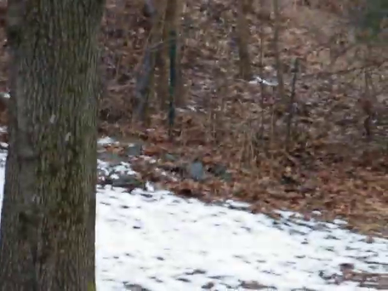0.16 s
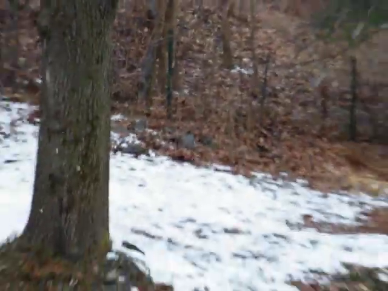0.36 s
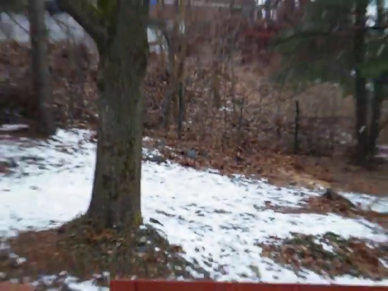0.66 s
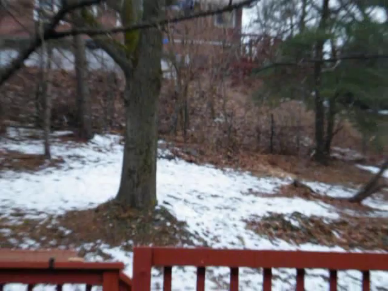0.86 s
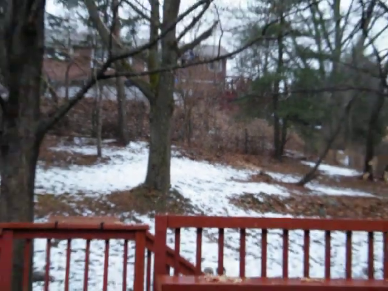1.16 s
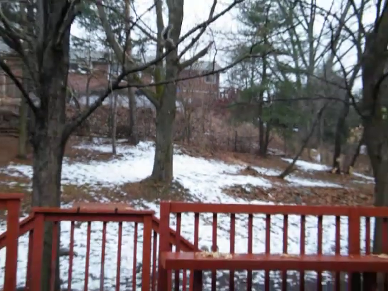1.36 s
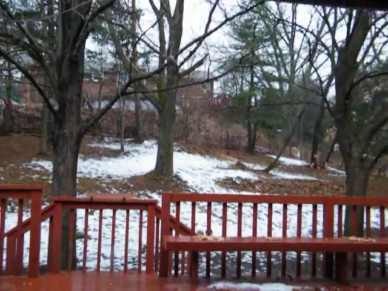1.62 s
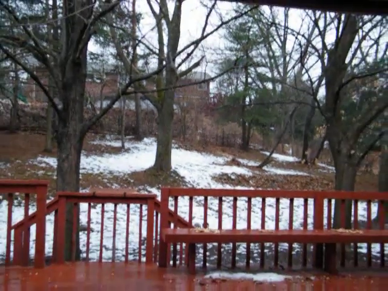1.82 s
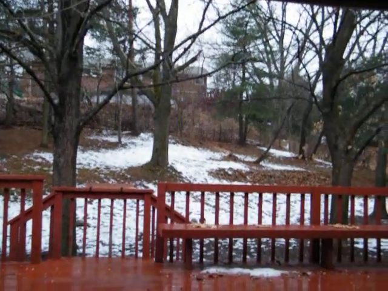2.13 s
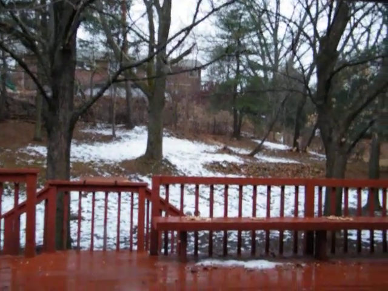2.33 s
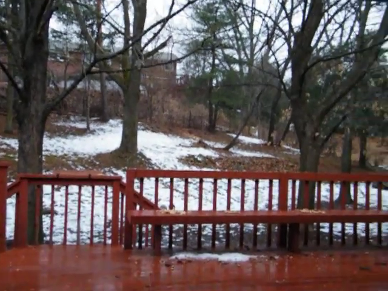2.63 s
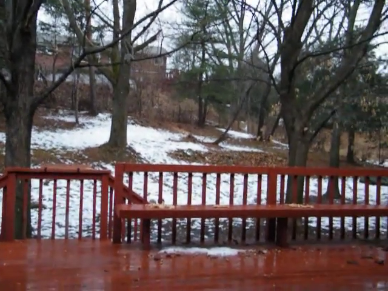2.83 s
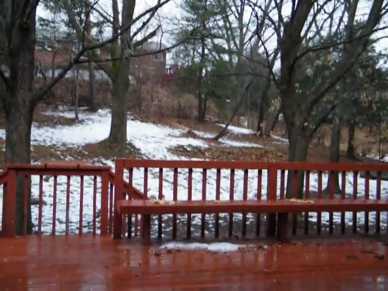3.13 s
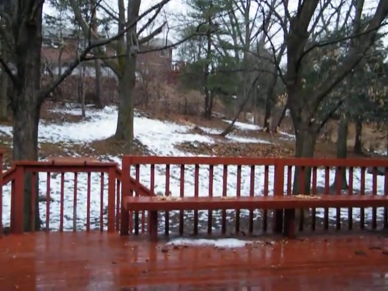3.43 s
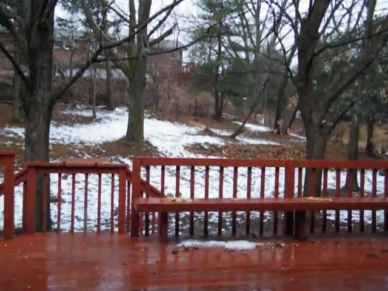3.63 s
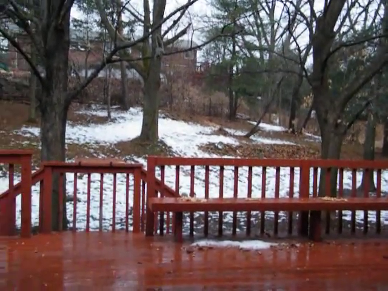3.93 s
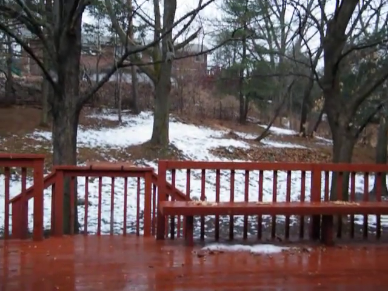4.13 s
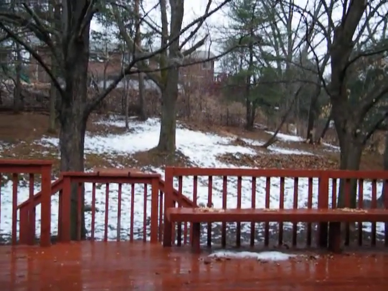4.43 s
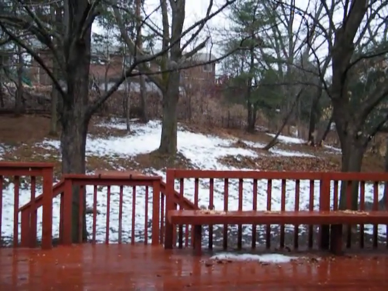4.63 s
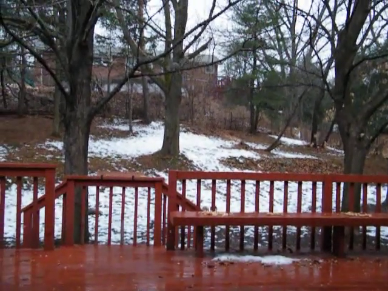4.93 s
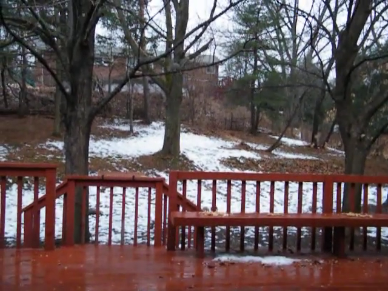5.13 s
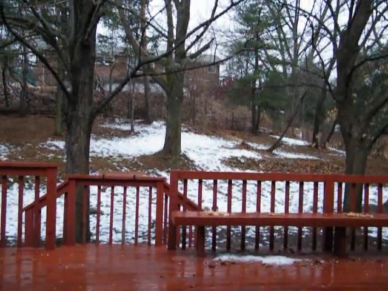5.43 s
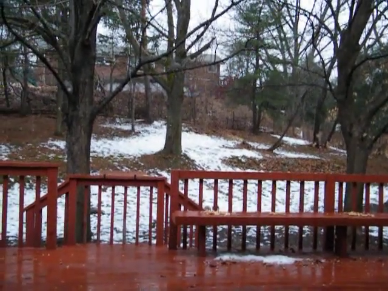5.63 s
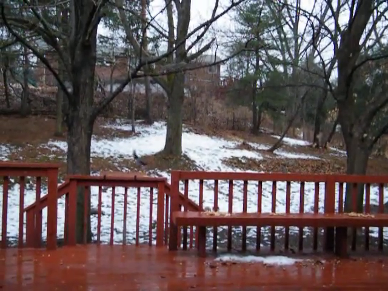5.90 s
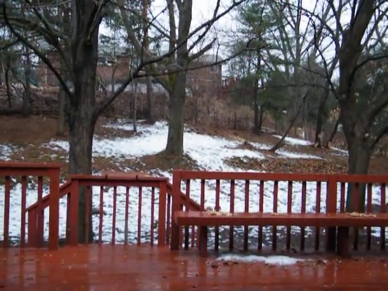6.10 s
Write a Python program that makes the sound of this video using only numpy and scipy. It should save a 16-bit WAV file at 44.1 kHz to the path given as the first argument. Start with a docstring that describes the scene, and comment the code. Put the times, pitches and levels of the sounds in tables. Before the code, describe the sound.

In a wooded, snowy yard, two close jay jeers ring out early, harsh and reedy, with echoes from a wall and trees. Handling clicks come right at the microphone before and around them. After a quieter stretch of distant jeers, leaf ticks and soft bell-like whistles, another very loud jeer bursts out, then a weaker one. Tiny chirps, whistles and overlapping distant jeers finish over airy hush, faint flock twitter and distant rumble.

```python
"""A faint whistle and a quick run of camera clicks in the hand open this snowy yard; then blue jays jeer close by.
Jeers are falling stacks of harmonics that fray into noise; duller ones answer from the woods.
Jays also whistle softly in nearly pure tones, small birds chirp in rising tones, and noise bursts tick as dry leaves.
Decaying noise echoes make a wall and trees; coloured noise makes air, a low distant rumble and a far flock.
The camera's gain ducks under loud calls."""
import sys
import numpy as np
from scipy import signal
from scipy.fft import rfft, irfft, next_fast_len
from scipy.io import wavfile
from scipy.ndimage import uniform_filter1d, minimum_filter1d, map_coordinates

SR = 44100
rng = np.random.default_rng(int(sys.argv[2]) if len(sys.argv) > 2 else 0)


def int16_out(signal):
    """Quantize to a 16-bit WAV file."""
    q = np.round(np.clip(np.atleast_2d(signal).T, -1, 1) * 32767)
    wavfile.write(sys.argv[1], SR, q.astype(np.int16))


N = 276066
TIME = np.arange(N) / SR


def amp(db):
    """Decibels to linear gain."""
    return 10 ** (np.asarray(db) / 20)


def unit(x):
    """Scale a sound to rms 1."""
    return x / np.sqrt(np.mean(x ** 2) + 1e-20)


def along(points, hz):
    """Read a curve of (Hz, value) points on a log frequency axis."""
    f, v = np.transpose(points)
    return np.interp(np.log(hz + 1), np.log(f), v)


def wobble(rate, size):
    """A smooth random curve with rate knots a second."""
    knots = rng.standard_normal(int(size * rate / SR) + 4)
    return map_coordinates(knots, [np.arange(size) * rate / SR])


def filtered(x, response):
    """Shape the spectrum of x by a response given as a function of Hz."""
    padded = next_fast_len(len(x) + 8192)
    spectrum = rfft(x, padded) * response(np.fft.rfftfreq(padded, 1 / SR))
    return irfft(spectrum, padded)[:len(x)]


def noise(spectrum, size=N):
    """Coloured noise of rms 1."""
    return unit(filtered(rng.standard_normal(size), lambda hz: amp(along(spectrum, hz))))


def add(track, s, sound):
    """Mix a sound into the track at time s."""
    part = track[max(round(s * SR), 0):][:len(sound)]
    part += sound[:len(part)]


def gate(t, start, end, rise, fall):
    """Open from start and die away after end; rise and fall are time constants in seconds."""
    opening = 1 - np.exp(-np.maximum(t - start, 0) / rise)
    return opening * np.exp(-np.maximum(t - end, 0) / fall)


# How long the trees ring on in each band. Each row: frequency in Hz, time to fall 60 dB in seconds.
WOODS_DECAY = [(500, 0.25), (1700, 0.65), (3400, 0.64), (7000, 0.46), (14000, 0.056)]


def yard(x, near_db, woods_db, near_t60=0.67):
    """Add sparse scatter from the deck and wall, then the dense tail of the trees with its own decay per band."""
    hz, t, z = signal.stft(rng.standard_normal(SR), SR, nperseg=256)
    decay = amp(-60 * t / along(WOODS_DECAY, hz)[:, None])
    tail = signal.istft(z * decay, SR, nperseg=256)[1]
    t = np.arange(len(tail)) / SR
    tail = tail * (1 - np.exp(-t / 0.008))  # the trees build up softly
    sparse = (rng.random(len(t)) < .02) * (t > .003)
    near = rng.standard_normal(len(t)) * sparse * amp(-60 * t / near_t60)
    echo = amp(near_db) * near / np.linalg.norm(near) + amp(woods_db) * tail / np.linalg.norm(tail)
    wet = x + signal.fftconvolve(x, echo)[:N]
    return wet / np.sqrt(1 + np.sum(echo ** 2))  # allow for the energy the echo adds


# Colour of the open air. Each row: frequency in Hz, relative level in dB.
AIR_TONE = [(20, -3), (36, -14.5), (60, -1), (85, 4.5), (150, -4), (200, -3), (400, -7), (1000, -14),
            (2000, -19), (4000, -22.5), (7000, -21), (10000, -36), (16000, -42)]
# Bands of far traffic. Each row: centre in Hz, distance to 1/e of the peak gain in Hz, rms level in dB.
TRAFFIC_DRONE = [(92, 37, -51.5), (190.7, 17, -48.5), (289, 30.5, -52.5)]
# Colour of the far flock. Each row: frequency in Hz, relative level in dB.
FLOCK_TONE = [(4000, -35), (5500, 6), (6300, 16), (7300, -20), (8500, -9), (11000, -56)]


def background():
    """Noise shaped into open air, narrow low bands of far traffic and the swelling, blurred twitter of a flock."""
    out = amp(-40 + 1.38 * wobble(2.0, N)) * noise(AIR_TONE)
    for centre_hz, width_hz, db in TRAFFIC_DRONE:
        band = filtered(rng.standard_normal(N), lambda hz: np.exp(-((hz - centre_hz) / width_hz) ** 2))
        out += amp(db) * unit(band)
    swell_db = 2.5 * wobble(4, N) + 1.5 * wobble(25, N)
    return out + amp(-58.5 + swell_db) * noise(FLOCK_TONE)


# Spells of rummaging in the leaves. Each row: start in seconds, end in seconds, mean tick level in dB before trim.
RUMMAGE_SPELLS = [(1.885, 1.95, -42), (2.92, 2.998, -41), (3.317, 3.395, -33), (3.603, 3.673, -29),
                  (4.422, 4.498, -27)]
RUMMAGE_PER_S = 60  # small ticks a second


def rummaging(scatter_db=3):
    """Small ticks at chance moments and levels within each spell."""
    ticks = []
    for start, end, db in RUMMAGE_SPELLS:
        for _ in range(round((end - start) * RUMMAGE_PER_S)):
            ticks.append((rng.uniform(start, end), db + rng.normal(0, scatter_db)))
    return ticks


# Loudest ticks in the leaves. Each row: start in seconds, level in dB before trim.
LOUD_TICKS = [(2.6433, -23.5), (2.7608, -23), (2.9963, -22), (3.3862, -21), (3.5098, -23), (3.582, -26),
              (4.566, -18), (4.7146, -21), (5.646, -26), (6.0378, -18.5), (6.145, -24)]
# Colour of a dry snap, shared with the camera's crack. Each row: frequency in Hz, relative level in dB.
SNAP_TONE = [(1200, -65), (2500, -14), (4000, -6.5), (6300, 6.5), (8500, -8), (11000, -15.5), (16000, -23)]


def leaf_ticks(trim_db=-4.5):
    """Dry snaps of fast-decaying noise, each with a longer uneven crumble under it."""
    out, t = np.zeros(N), TIME[TIME < .1]
    for s, db in LOUD_TICKS + rummaging():
        snap = amp(-60 * t / 0.017)
        crumble = amp(-8 - 60 * t / 0.22 + 2.26 * wobble(410, len(t)))
        add(out, s, amp(db + trim_db) * (snap + crumble) * noise(SNAP_TONE, len(t)))
    return yard(out, near_db=-8, woods_db=-36.0)


RATCHET_START_S, RATCHET_STEP_S = .0712, .0193  # first click and even spacing
# first click before trim, growth per click, boost of the body knock
RATCHET_DB, RATCHET_GROWS_DB, RATCHET_KNOCK_DB = -20.5, 1.76, 7


def ratchet(count):
    """An even run of clicks, each a little firmer than the last."""
    clicks = []
    for k in range(count):
        start = RATCHET_START_S + k * RATCHET_STEP_S
        clicks.append((start, RATCHET_DB + k * RATCHET_GROWS_DB, RATCHET_KNOCK_DB))
    return clicks


# Single camera clicks. Each row: start in seconds, level in dB before trim, boost of the low body knock in dB.
SINGLE_CLICKS = [(0.2286, -10, -7), (0.239, -11, 4), (.5875, -12.5, 7.5), (0.722, -2.5, -2.5),
                 (.914, -9.5, -3), (1.621, -18, 1)]
# Ringing modes of the plastic case. Each row: frequency in Hz, mean level in dB before the click's own level,
# time to fall 60 dB in seconds.
CASE_MODES = [(775, -7.5, 0.053), (1107, -6, 0.016), (2693, -1.5, 0.012), (4250, 10, 0.0045),
              (4570, -5, 0.039), (6130, 3, 0.0094), (6700, -20, 0.015), (8200, -10, 0.0174)]


def camera_clicks(trim_db=-9.5):
    """Each click cracks with noise and rings the plastic case; its knock sets how far the low modes join in."""
    out, t = np.zeros(N), TIME[TIME < .05]
    for s, db, knock_db in ratchet(count=5) + SINGLE_CLICKS:
        ring = np.zeros(len(t))
        for hz, mode_db, t60 in CASE_MODES:
            level_db = mode_db + knock_db * (hz < 2000) + rng.normal(0, 3.4)  # no two clicks alike
            phase = 2 * np.pi * hz * t + 1.4 * wobble(524, len(t))
            ring += amp(level_db - 60 * t / t60) * np.sin(phase)
        crack = amp(-3 - 60 * t / 0.018) * noise(SNAP_TONE, len(t))
        attack = 1 - np.exp(-t / 0.000085)
        add(out, s, amp(db + trim_db) * (ring + crack) * attack)
    return out


# Small birds. Each row: start in seconds, length in seconds, top pitch in Hz, level in dB before trim.
SMALL_BIRDS = [(0.204, 0.027, 7260, -31.5), (0.46, 0.012, 7915, -19.5), (2.192, .025, 7510, -40),
               (2.277, 0.019, 7900, -33), (2.457, 0.0123, 7920, -22), (3.037, 0.021, 8200, -36),
               (3.273, 0.0444, 7500, -37), (3.473, 0.01, 8150, -22), (4.476, 0.022, 7966, -29),
               (5.075, 0.0469, 8740, -45), (5.299, 0.024, 8200, -35), (5.362, 0.036, 8400, -38.5),
               (5.552, .028, 7600, -35.5), (5.573, .016, 7940, -25.5), (5.602, 0.014, 7520, -27)]
CHIRP_FROM_HZ, CHIRP_BEND = 5900, .7  # start pitch; a bend below 1 rises fastest at first


def chirps(trim_db=-0.5):
    """Thin upward flicks of a single tone that hang on in the trees."""
    out = np.zeros(N)
    for s, length, top_hz, db in SMALL_BIRDS:
        u = TIME[TIME < length] / length
        pitch = CHIRP_FROM_HZ + (top_hz - CHIRP_FROM_HZ) * u ** CHIRP_BEND + 60 * wobble(565, len(u))
        swell = np.sqrt(np.abs(np.sin(np.pi * u)))
        tone = np.sin(2 * np.pi * np.cumsum(pitch) / SR)
        add(out, s, amp(db + trim_db) * swell * tone)
    return yard(out, near_db=-17, woods_db=-3.5, near_t60=0.15)


# Whistled notes. Each row: start in seconds, length in seconds, pitch in Hz, level in dB before trim.
WHISTLE_NOTES = [(0, .14, 1636, -32), (3.145, 0.062, 1696, -19), (3.201, 0.045, 1688, -24),
                 (3.269, 0.0708, 1683, -23.5), (3.355, 0.045, 1673, -24), (5.454, 0.094, 1687, -19.5),
                 (5.568, 0.15, 1670, -24.5)]
# Strength of the whistle's first five harmonics, each value a relative level in dB.
WHISTLE_HARMONICS = [1.5, -25.5, -28.5, -58, -31]
PAUSE_S = .4  # a start this long after the previous start opens a group
LEAD_S, LEAD_FLAT_HZ, LEAD_DB = .026, 69.8, -15  # a faint lead-in: how early, how flat, how much softer
WHISTLE_LEAN = 0.72  # below 1, a note swells faster than it fades


def whistles(echo_s=0.077, echo_db=-19, round_power=0.76, trim_db=1.5):
    """A jay's soft bell-like notes: nearly pure tones that swell and fade, with a late echo; lead-ins open groups."""
    out, notes = np.zeros(N), list(WHISTLE_NOTES)
    for before, (s, length, hz, db) in zip(WHISTLE_NOTES, WHISTLE_NOTES[1:]):
        if s - before[0] > PAUSE_S:
            notes.append((s - LEAD_S, 2 * LEAD_S, hz - LEAD_FLAT_HZ, db + LEAD_DB))
    for s, length, hz, db in notes:
        u = TIME[TIME < length] / length
        phase = 2 * np.pi * np.cumsum(hz * (1 + 0.004241 * wobble(82, len(u)))) / SR
        tone = sum(amp(level) * np.sin(k * phase) for k, level in enumerate(WHISTLE_HARMONICS, 1))
        swell = np.abs(np.sin(np.pi * u ** WHISTLE_LEAN)) ** round_power
        note = amp(db + trim_db) * swell * tone
        add(out, s, note)
        add(out, s + echo_s, amp(echo_db) * note)
    return yard(out, near_db=-10, woods_db=-16.5)


# Resonance of the jay's throat. Each row: frequency in Hz, relative level in dB.
THROAT_TONE = [(900, -20.5), (1750, -12.5), (2600, -2.5), (3300, -2.5), (3750, -1.5), (4300, -5),
               (5300, -3), (6200, 3), (6800, 1.5), (7500, -7), (9300, -19.5), (12000, -32), (16000, -44)]


def jeer(t, pitch, bright_db, low_db, shrill_db, odd_db, rough, rasp_depth, carry_db,
         scoop=0.27, scoop_s=.011, rasp_s=0.0262, hoarse=0.38, flutter_db=3.5):
    """A reedy stack of harmonics that scoops up out of a rasp and breaks up again as it ends."""
    size = len(t)
    rasp = np.exp(-t / rasp_s) + 0.87 * np.exp(-((t - t[-1]) / 0.029) ** 2)
    waver = .0018 * wobble(160, size) + .0015 * wobble(30, size)
    waver = waver + rasp_depth * rasp * wobble(900, size)
    pitch = pitch * (1 - scoop * np.exp(-t / scoop_s)) * (1 + waver)
    phase = 2 * np.pi * np.cumsum(pitch) / SR
    voice, power = np.zeros(size), np.zeros(size)
    for k in np.arange(2, 20):
        # every fourth harmonic carries the call; cycles differ in a pattern of four, adding weaker lines between
        pattern_db = odd_db * (k % 2 + .25 * (k % 4 == 2)) + carry_db * (k == 4)
        tilt_db = bright_db * abs(np.log2(k / 4)) + low_db * (k == 2)
        tilt_db = tilt_db + shrill_db * np.clip((k - 8) / 6, 0, 1)
        flutter = flutter_db * wobble(45.722, size)
        gain = amp(along(THROAT_TONE, k * pitch) + pattern_db + tilt_db + flutter)
        # the upper harmonics fray into noise more than the low ones
        fray_depth = (rough + hoarse * rasp) * min(k / 7, 1) ** 2
        fray = wobble(800, size) * np.cos(k * phase) + wobble(800, size) * np.sin(k * phase)
        voice += gain * (np.sin(k * phase) + fray_depth * fray)
        power += gain ** 2 / 2
    return voice / np.sqrt(power) * (1 + .4 * rough * wobble(500, size))


# Answering jeers. Each row: start in seconds, end in seconds, top base pitch in Hz, end base pitch in Hz,
# level at the start in dB, swell by the end in dB, brightness in dB per octave either side of the fourth harmonic.
ANSWERING_JEERS = [(0.385, 0.704, 918, 775, -37, 8.5, -7.5), (1.667, 1.964, 907, 781, -38, 1.5, -10),
                   (2.201, 2.5, 892, 833, -51, -0.5, -9), (2.527, 2.852, 895.1, 781, -39.5, 11, -17),
                   (3.733, 4.078, 948, 854, -25.5, -6, -6), (4.104, 4.43, 921, 795, -49, 15, -10),
                   (5.088, 5.412, 905, 867, -46, -3, -36), (5.824, 6.147, 946.7, 840.2, -29.5, -4.5, -8.5),
                   (5.951, 6.298, 999, 866, -33, -7.5, -9)]


def far_jays(odd_db=-9, carry_db=3, low_db=4):
    """Answers from the woods hold their top pitch briefly and slide down; distance dulls them."""
    out = np.zeros(N)
    for start, end, top_hz, end_hz, db, swell_db, bright_db in ANSWERING_JEERS:
        t = TIME[TIME < end - start + .03]
        u = t / (end - start)
        pitch = np.interp(u, [.2, 1], [top_hz, end_hz])
        level = amp(db + swell_db * u) * gate(t, 0, end - start, rise=0.022, fall=0.0056)
        call = jeer(t, pitch, bright_db, low_db=low_db, shrill_db=-9, odd_db=odd_db,
                    rough=.26, rasp_depth=.03, carry_db=carry_db)
        add(out, start, level * call)
    return yard(out, near_db=-8, woods_db=-14, near_t60=.15)


# Close jeers. Each row: start in seconds, length in seconds, top base pitch in Hz, resting base pitch in Hz,
# time to slide halfway in seconds, level in dB before drive, soft start in dB, sag in dB per second,
# brightness in dB per octave either side of the fourth harmonic, boost of the lowest harmonic in dB,
# boost of the top harmonics in dB, boost of the odd harmonics in dB, roughness from 0 to 1, woods echo in dB.
CLOSE_JEERS = [(.731, 0.37, 937.7, 813.7, 0.17, -13, -2, -5.5, -0.8, -2, 1, -12, 0.25, -15.5),
               (1.232, 0.35, 923, 812, 0.21, -15, -6.5, -16, -1, -6, -5.5, -9, 0.17, -12),
               (3.887, 0.31, 962, 859, .105, -10, -3, -29, -2, 0.5, 7.5, -14, 0.39, -16),
               (4.588, .35, 922, 827.3, 0.28, -28, -8, -5.5, -5, -0.5, 3, -7, 0.04, -7)]
SLIDE_STEEPNESS = 3.0  # how sharply a jeer leaves its top pitch
SWELL_S = 0.023  # time constant of a soft start
DROOP, DROOP_S = 0.029, .012  # share of the pitch lost as the voice gives out, and how quickly in seconds


def close_jays(drive_db=4, wall_s=.034, wall_db=-10):
    """Loud jeers by the deck slide from top pitch toward rest and droop; the wall's late copy beats against each."""
    out = np.zeros(N)
    for (onset, length, top_hz, rest_hz, half_s, db, soft_db, sag_db,
         bright_db, low_db, shrill_db, odd_db, rough, woods_db) in CLOSE_JEERS:
        t = TIME[TIME < length + .035]
        pitch = rest_hz + (top_hz - rest_hz) / (1 + (t / half_s) ** SLIDE_STEEPNESS)
        pitch = pitch * (1 - DROOP / (1 + np.exp((length - t) / DROOP_S)))
        effort_db = db + drive_db + soft_db * np.exp(-t / SWELL_S) + sag_db * t
        level = amp(effort_db) * gate(t, 0, length, rise=0.0035, fall=0.032)
        call = level * jeer(t, pitch, bright_db, low_db, shrill_db, odd_db, rough,
                            rasp_depth=0.0903, carry_db=3.5)
        heard = np.zeros(N)
        add(heard, onset, call)
        add(heard, onset + wall_s, amp(wall_db) * call)
        out += yard(heard, near_db=-10, woods_db=woods_db, near_t60=.12)
    return out


def scene():
    """Mix all layers, from the open air up to the close jays."""
    distant = background() + far_jays()
    small = leaf_ticks() + camera_clicks() + chirps()
    return (distant + small + whistles() + close_jays())[None]


TOP_HZ = 16100  # nothing passes above this


def record(dry, notch_hz=4830, width_hz=190, depth_db=20, limit_db=-11.5, hold_s=0.183):
    """The microphone has a narrow notch; the gain ducks under loud calls and the highest peaks are rounded off."""
    x = filtered(dry[0], lambda hz: amp(-depth_db / (1 + ((hz - notch_hz) / width_hz * 2) ** 2)))
    loudness = np.sqrt(np.abs(uniform_filter1d(x ** 2, size=2048)))
    needed_gain = amp(limit_db) / np.maximum(loudness, amp(limit_db))
    hold = int(hold_s * SR)
    held_gain = minimum_filter1d(needed_gain, hold, origin=(hold - 1) // 2)  # stays down for the hold time
    x = x * uniform_filter1d(held_gain, size=1024)
    x = x / (1 + np.abs(x / .76) ** 8) ** (1 / 8)  # peaks bend toward a ceiling of 0.76
    return filtered(x, lambda hz: hz < TOP_HZ)[None]


dry = scene()
out = record(dry)
int16_out(out)
```